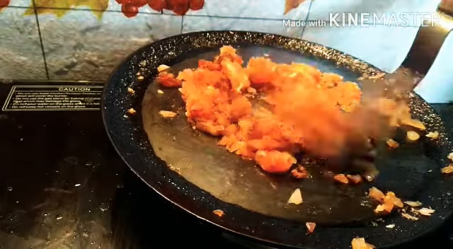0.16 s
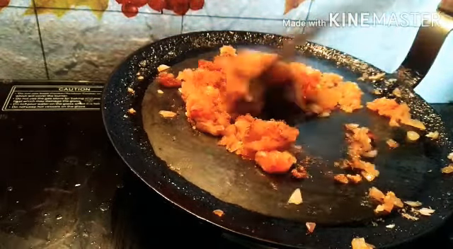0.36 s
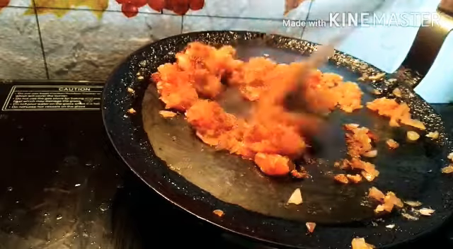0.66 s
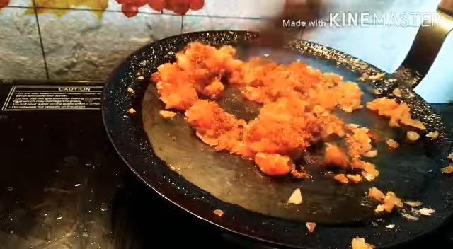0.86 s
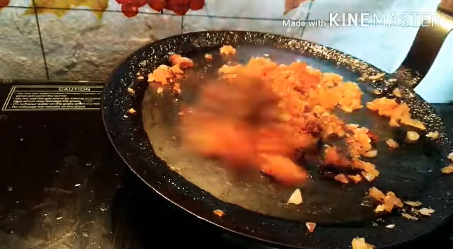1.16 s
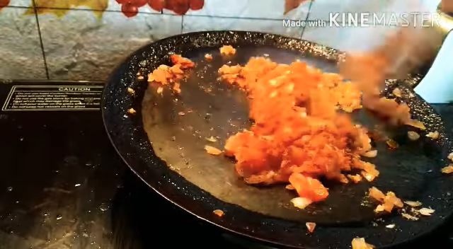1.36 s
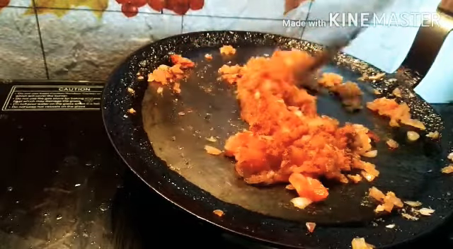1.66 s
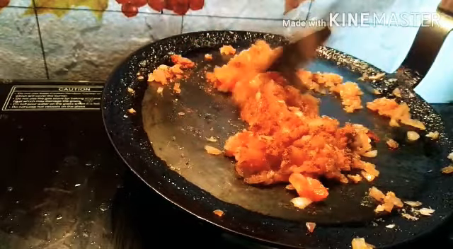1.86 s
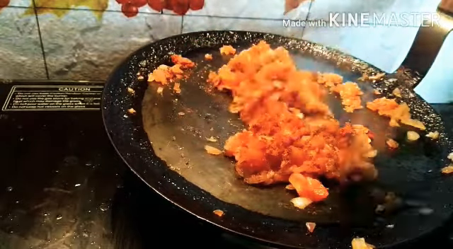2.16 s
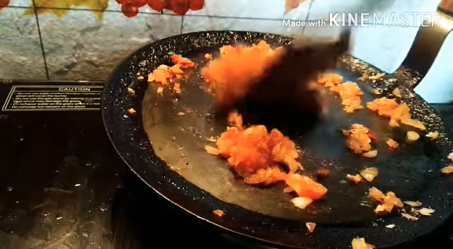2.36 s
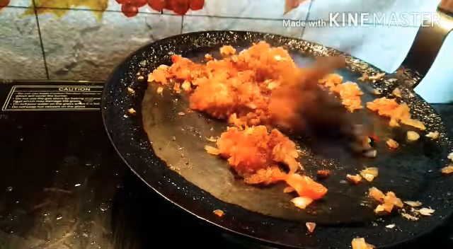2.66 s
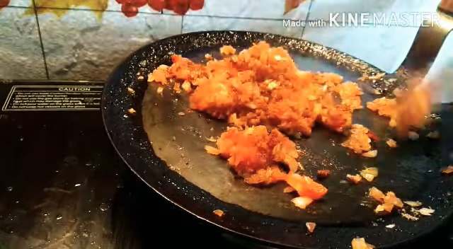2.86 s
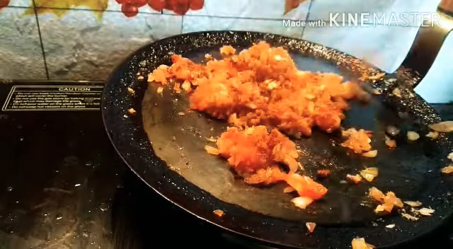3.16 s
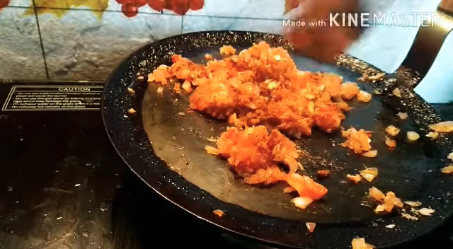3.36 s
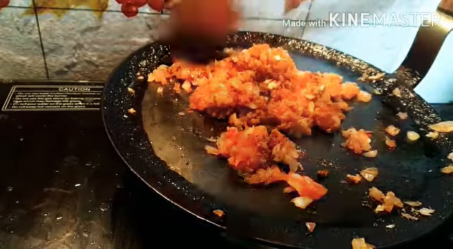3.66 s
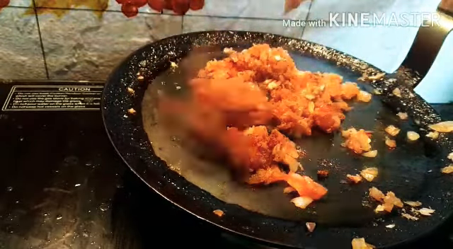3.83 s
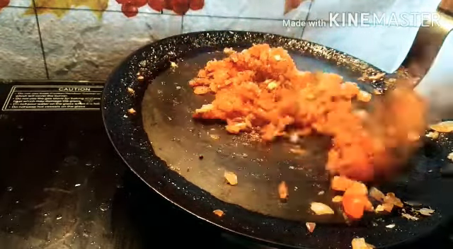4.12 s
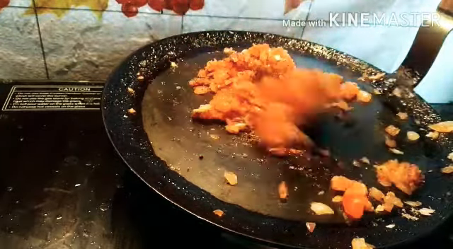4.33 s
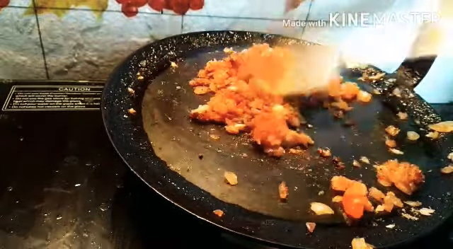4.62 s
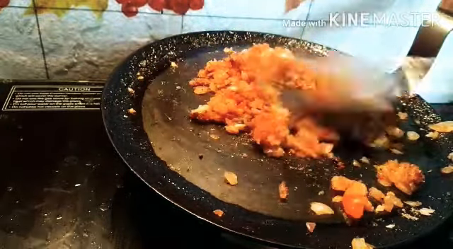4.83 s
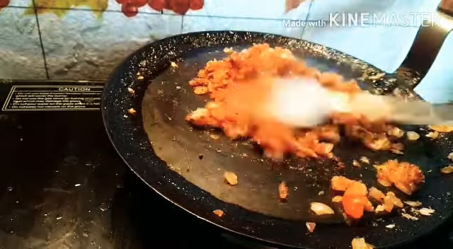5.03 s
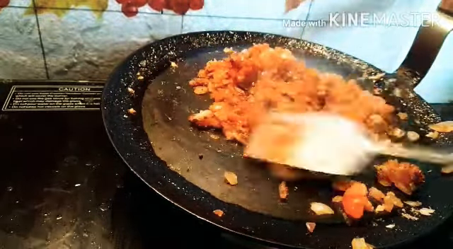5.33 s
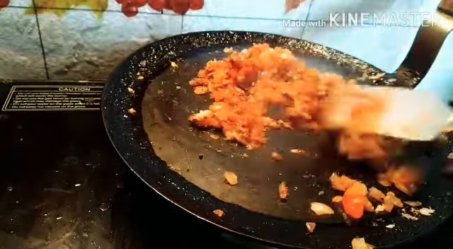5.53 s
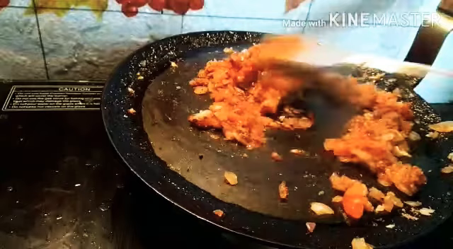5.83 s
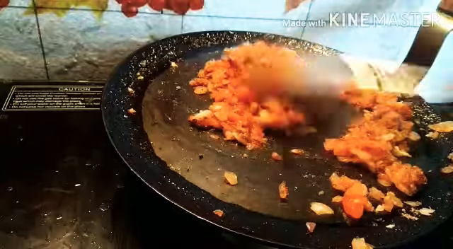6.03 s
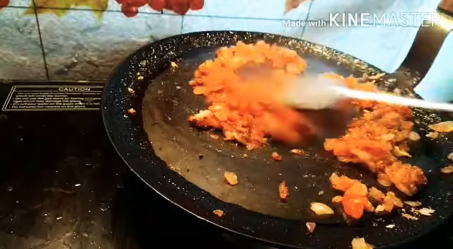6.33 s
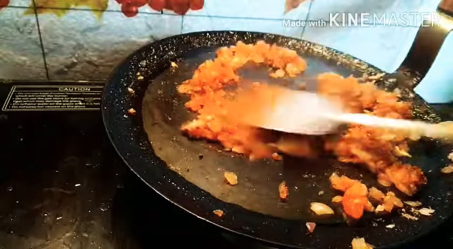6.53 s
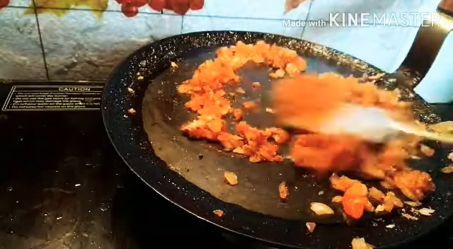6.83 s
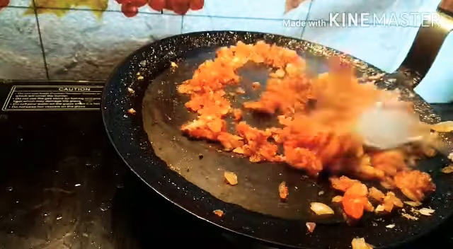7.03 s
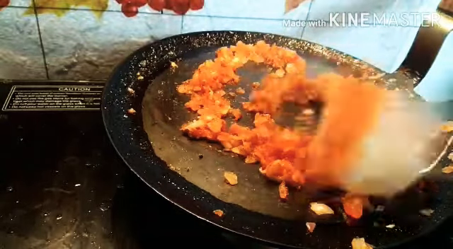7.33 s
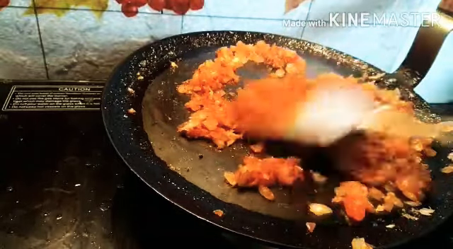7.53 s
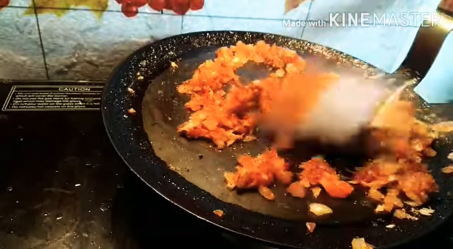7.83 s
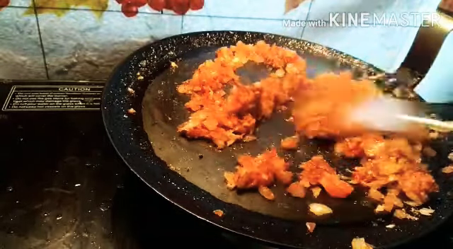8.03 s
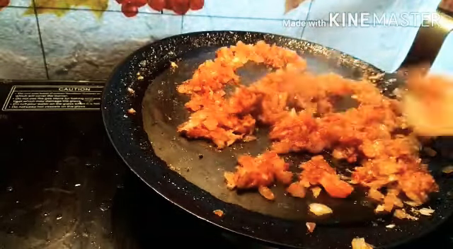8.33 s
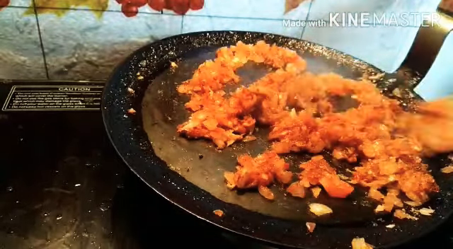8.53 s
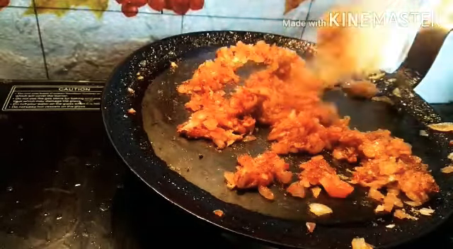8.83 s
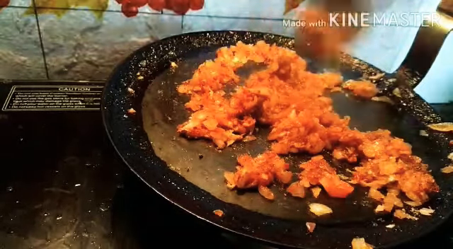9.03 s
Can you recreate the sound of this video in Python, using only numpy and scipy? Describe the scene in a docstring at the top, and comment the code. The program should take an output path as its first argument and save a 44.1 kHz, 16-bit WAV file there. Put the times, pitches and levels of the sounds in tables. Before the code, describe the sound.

A steel spatula turns chopped vegetables on a flat iron griddle, close to the microphone in a small kitchen with a slight echo. Oil sizzles faintly throughout, above a barely audible low burner rush. From the start until about 4.3 seconds, the blade lands in sharp, uneven clacks, roughly two a second, each with a brief metallic ring and a short skid, sometimes a tiny squeak. The strongest fall near 2.2, 3, 3.4 and 4.3 seconds. After that the stirring turns quieter, with light scrapes and soft, wet pushes through the food. The griddle bumps dully on its stand several times around 5.8 to 6 seconds, again between 7.1 and 7.6, and near 8.5. A brighter scrape comes at 7.5 seconds and a thin squeak just after 8. One last loud, ringing clack and short scrape arrive at about 9 seconds.

```python
"""Spatula on a griddle

A small tiled kitchen, a stereo microphone close to a flat iron griddle. A steel spatula turns chopped
vegetables: it lands with a short chatter, skids over the iron, catches with a squeak and pushes the wet
heap along; later it mostly nudges the food. The griddle bumps on its stand now and then, and oil
sizzles faintly throughout over the low rush of the burner."""
import sys
import numpy as np
from scipy import signal
from scipy.fft import rfft, irfft, next_fast_len
from scipy.io import wavfile

SR = 44100
rng = np.random.default_rng(int(sys.argv[2]) if len(sys.argv) > 2 else 0)


def store_wav(level_fs):
    """Save 16-bit WAV to argv[1]."""
    pcm = np.round(np.clip(np.atleast_2d(level_fs), -1, 1) * 32767)
    wavfile.write(sys.argv[1], SR, pcm.T.astype(np.int16))


N = 404838

# blade landings and the skid after each: (time [s], contact [s], level [dB], brightness [dB],
# thud [dB], plate ring [dB], skid length [s], skid against landing [dB])
LANDINGS = [(.19, 0.034, -41, -5, -32, -29.5, 0.0024, 0), (.213, 0.022, -28, 2.5, -40, -28, 0.016, 0),
            (.601, 0.019, -38, 6, -38, -58, 0.0004, 3), (.61, 0.0067, -21.5, 3.5, -45.5, -57, 0.085, -11),
            (1.013, 0.0078, -18.5, -3, -28, -44, 0.051, -11.5),
            (1.515, 0.025, -22.5, 3.5, -37.5, -53, 0.046, -3),
            (1.837, 0.0095, -19, 2, -31.5, -12.5, 0.13, -9.5),
            (1.922, 0.015, -31.5, 7.5, -46, -60, 0.0086, 0), (2.248, 0.015, -16, 1, -23.5, -33, 0.089, -8),
            (2.975, 0.0098, -15.5, 1.5, -24, -31, 0.052, -9),
            (3.448, 0.0064, -13, -3, -33.5, -20, 0.14, -20), (4.255, 0.019, -15, 1, -26.5, -26, 0.056, -9),
            (6.311, 0.0071, -50.5, -14.5, -48.5, -34, 0.0065, 0),
            (7.098, 0.0042, -37, -1, -41, -58, 0.034, -9.5), (7.169, 0.0072, -51, -1, -63, -41, 0.0042, 0),
            (8.076, .003, -40, 0.5, -62, -49, 0, -2), (8.084, .013, -42.5, 5.5, -65, -57, 0.092, -4.5),
            (8.616, 0.019, -64.5, -15, -51, -48, 0.0067, 1),
            (9.049, 0.0099, -15.5, -2.5, -30, -18, 0.16, -15)]


def from_db(db):
    """Decibels to gain."""
    return 10 ** (np.asarray(db) / 20)


def rms(x):
    """Root mean square."""
    return np.sqrt(np.mean(x ** 2) + 1e-20)


def at_hz(points, hz):
    """Read a table on a log-frequency axis."""
    known_hz, values = np.transpose(points)
    return np.interp(np.log(np.maximum(hz, 1)), np.log(known_hz), values)


def add(out, s, sound):
    """Mix a sound in at time s."""
    i = max(round(s * SR), 0)
    out[..., i:i + sound.shape[-1]] += sound[..., :N - i]


def band(x, low_hz, high_hz, order=2):
    """Causal band-pass."""
    sos = signal.butter(order, [low_hz, min(high_hz, SR / 2 - 10)], "band", fs=SR, output="sos")
    return signal.sosfilt(sos, x)


def colour(x, spectrum):
    """Give a signal a smooth spectrum."""
    n = next_fast_len(x.shape[-1] + 2048)
    gain = from_db(at_hz(spectrum, np.fft.rfftfreq(n, 1 / SR)))
    return irfft(rfft(x, n) * gain, n)[..., :x.shape[-1]]


def drift(n, rate):
    """A random wander with about rate turns a second."""
    knots = rng.standard_normal(4096)
    return np.interp(np.arange(n) * rate / SR, np.arange(len(knots)), knots)


def ring(clicks, hz, t60):
    """A unit click sets a sine of height 1 ringing."""
    decay, step = from_db(-60 / (t60 * SR)), 2 * np.pi * hz / SR
    return signal.lfilter([0, np.sin(step)], [1, -2 * decay * np.cos(step), decay ** 2], clicks + 1e-18)


def grains(shape, per_s, spread_db=3.0):
    """Random clicks of uneven size and sign."""
    born = rng.random(shape) < per_s / SR
    sign = rng.choice([-1, 1], shape)
    return born * sign * from_db(spread_db * np.minimum(rng.exponential(1, shape), 4))


def at_ports(pair):
    """Two unrelated signals become the microphone's left and right, alike in the bass."""
    # likeness of the two ports: (frequency [Hz], correlation)
    likeness = [(60, 0.49), (250, 0.94), (700, 0.13), (1500, 0.48), (3000, 0.28), (7000, 0)]
    n = next_fast_len(pair.shape[-1])
    mid, side = rfft(pair, n)
    alike = at_hz(likeness, np.fft.rfftfreq(n, 1 / SR))
    spectra = np.sqrt((1 + alike) / 2) * mid + np.sqrt((1 - alike) / 2) * side * [[1], [-1]]
    return irfft(spectra, n)[:, :pair.shape[-1]]


def kitchen(x, build_s=0.0035):
    """Diffuse echo off the tiled walls; it builds up quickly and dies soonest at the very top."""
    # decay of the room: (frequency [Hz], t60 [s])
    decay = [(100, 0.37), (500, 0.29), (2000, 0.32), (5000, 0.3), (10000, 0.39), (16000, 0.21)]
    t = np.arange(SR * 2 // 3) / SR
    white = at_ports(rng.standard_normal((2, len(t))))
    edges_hz = np.geomspace(40, 18000, 10)
    tail = sum(band(white, low, high) * from_db(-60 * t / at_hz(decay, np.sqrt(low * high)))
               for low, high in zip(edges_hz, edges_hz[1:]))
    tail *= 1 - np.exp(-(t / build_s) ** 2)
    return signal.fftconvolve(x, tail / (rms(tail) * np.sqrt(len(t))), axes=1)[:, :N]


def burner(level_db=-64.5, flutter_db=3.0):
    """The low, unsteady rush of the stove, far down in the background."""
    # colour of the rush: (frequency [Hz], level [dB])
    spectrum = [(25, -30), (55, -7), (88, 3.5), (125, -10), (250, -10.5), (390, -9), (620, -8),
                (1100, -27.5), (2500, -51.5)]
    rush = colour(at_ports(rng.standard_normal((2, N))), spectrum)
    return rush / rms(rush) * from_db(level_db + flutter_db * drift(N, rate=14))


def sizzle(crackle_db=-2, gain_db=4.0):
    """Countless tiny bursts in the oil merge to a steady hiss; those nearer the microphone prickle."""
    # colour of frying oil: (frequency [Hz], level [dB])
    spectrum = [(500, -37.5), (900, -10.5), (1350, -13.5), (1500, -4), (1690, -14), (1900, -8.5),
                (3200, -6.5), (5000, -4), (7300, -7), (11400, 3.5), (15500, -5)]
    # vigour of the frying: (time [s], level [dB])
    vigour = [(0.0, -47.5), (0.53, -52), (0.68, -49.5), (2.1, -48), (3.31, -50.5), (3.56, -49.5),
              (4.41, -52), (7.67, -51.5), (7.87, -52.5), (9.0, -54)]
    pops = grains((2, N), per_s=660, spread_db=0.5)
    bursts = rng.standard_normal((2, N)) + from_db(crackle_db) * pops / rms(pops)
    hiss = colour(at_ports(bursts), spectrum)
    vigour_db = np.interp(np.arange(N) / SR, *np.transpose(vigour))
    return hiss / rms(hiss) * from_db(vigour_db + gain_db)


def heap(ring_cycles=20, spread_octaves=0.45, attack_s=0.023, release_s=0.022, lumpy_db=2, gain_db=-1):
    """Soft wet pieces tumble and squelch, each with a short low note near the pitch of the push."""
    # the blade pushes the food: (time [s], length [s], level [dB], squelch pitch [Hz])
    pushes = [(0.0, .14, -51, 383), (0.798, .04, -61, 296), (0.916, .06, -62, 440),
              (2.06, 0.047, -60.5, 310), (3.042, 0.056, -42.5, 420), (3.118, 0.11, -57, 490),
              (4.071, 0.18, -63.5, 529.4), (5.292, 0.28, -65.5, 520), (5.55, 0.024, -53.5, 530),
              (5.678, 0.21, -60.5, 530), (6.885, 0.12, -62, 296), (7.288, 0.31, -63, 380),
              (7.721, .11, -54, 340), (7.844, 0.033, -48.5, 293), (8.353, 0.28, -62.5, 423),
              (8.593, 0.034, -47.5, 294), (8.66, 0.14, -57.5, 480)]
    out, t = np.zeros(N), np.arange(SR // 2) / SR
    notes_hz = np.geomspace(230, 700, 14)
    for s, length_s, db, pitch_hz in pushes:
        shares = 1 / (1 + (np.log2(notes_hz / pitch_hz) / spread_octaves) ** 2)
        notes = [ring(grains(len(t), per_s=140), hz, ring_cycles / hz) for hz in notes_hz]
        plops = sum(share * note / rms(note) for share, note in zip(shares, notes))
        effort = np.minimum(t / attack_s, 1) * np.exp(-np.maximum(t - length_s, 0) / release_s)
        level = from_db(db + gain_db + lumpy_db * drift(len(t), rate=35))
        add(out, s, level * effort * plops / rms(plops))
    return out


def bumps(gain_db=-5):
    """The griddle knocks on its stand and sets the stand's low modes ringing."""
    # dull knocks: (time [s], level [dB])
    knocks = [(5.807, -31), (5.843, -25.5), (5.868, -27), (5.917, -25), (6.017, -32.5), (7.101, -30),
              (7.162, -27.5), (7.511, -35), (7.578, -30.5), (8.399, -40), (8.551, -29.5)]
    # modes of the stand: (frequency [Hz], level [dB], t60 [s])
    modes = [(63, -2, 0.048), (92.7, -0.5, 0.12), (132, -2.5, 0.034), (185, -27, 0.025)]
    clicks = np.zeros(N)
    for s, db in knocks:
        add(clicks, s, from_db([db + gain_db]))
    return sum(from_db(db) * ring(clicks, hz, t60) * (-1) ** k for k, (hz, db, t60) in enumerate(modes))


def squeaks():
    """The edge catches: stick and slip briefly feeds one resonance of blade or plate."""
    # catches of the edge: (time [s], length [s], resonance name, level [dB])
    catches = [(.61, 0.0072, "zing", -13.5), (1.011, .013, "creak", -16.5), (1.212, .04, "drone", -46),
               (2.248, 0.034, "zing", -16.5), (2.251, 0.029, "whistle", -19), (2.337, .016, "screech", -30),
               (2.972, 0.016, "screech", -16.5), (5.653, .028, "drone", -53),
               (5.736, 0.081, "groan", -51.5), (5.98, .065, "scratch", -41), (7.106, 0.024, "groan", -39),
               (7.489, 0.062, "drone", -43.5), (8.07, .042, "zing", -27.5), (8.123, 0.045, "creak", -46),
               (8.135, 0.049, "scratch", -40), (9.048, 0.014, "screech", -14.5), (9.135, .06, "drone", -35)]
    # resonances by name: (frequency [Hz], width [Hz])
    resonances = {"groan": (527, 35), "drone": (916, 78), "creak": (2015, 180), "screech": (4760, 400),
                  "scratch": (6110, 1200), "whistle": (10230, 50), "zing": (11380, 260)}
    out, t = np.zeros((2, N)), np.arange(SR // 8) / SR
    for s, length_s, name, db in catches:
        hz, width_hz = resonances[name]
        friction = rng.standard_normal((2, len(t))) * np.exp(-(t / length_s) ** 2)
        tone = band(friction, hz - width_hz / 2, hz + width_hz / 2, order=1)
        add(out, s, from_db(db) * tone / rms(tone[:, :round(length_s * SR)]))
    return out


def register_levels(balance_db, level_db, brightness_db, thud_db):
    """The weight behind the blade sets the thud; its force and angle set the four upper registers."""
    # a steeper blade sounds brighter: (clank, grind, rasp, sheen) [dB per dB of brightness]
    tilt = (-0.93, -.5, -0.032, 0.9)
    return [thud_db, *(level_db + np.array(balance_db) + brightness_db * np.array(tilt))]


def griddle(force, levels_db, held_s, modes_db, knock_t60=0.0071, wash_db=-16, wash_t60=0.13):
    """What a force on one spot radiates: a dead knock, a wash of dense modes and the clear modes."""
    # broad colour of steel on iron: (frequency [Hz], level [dB])
    contact = [(60, 3), (140, 1.5), (195, -14), (260, 3.5), (480, 8.5), (650, 0), (1200, -5), (2000, 5.5),
               (2600, -0.5), (4700, 7.5), (7000, -3.5), (9500, 1.5), (11300, 4.5), (15500, -5.5)]
    # modes of griddle and blade: (frequency [Hz], level [dB], t60 [s])
    modes = [(143, -19.5, 0.21), (269, -15, 0.11), (348.3, -13, 0.14), (420, -12, 0.066),
             (522.5, -8.5, 0.18), (766, -12, 0.015), (864, -8, .09), (913, -5, 0.13), (1433, 0.5, 0.027),
             (1526, -7.5, 0.067), (2050, -5.5, 0.1), (3410, -10.5, 0.041), (3696, -1.5, .035),
             (4000, -33, .07), (4575, -6.5, 0.23), (4985, 1, 0.083), (5600, -2.5, 0.06), (5920, -4, 0.064),
             (7200, -15.5, 0.055), (8020, -9, 0.11), (8200, -7, 0.018), (8515, 1, 0.053),
             (10200, -1.5, 0.11), (10880, -3.5, 0.12), (11440, 2, 0.058), (11760, -7.5, 0.055),
             (12640, -6, 0.06)]
    # the registers thud, clank, grind, rasp and sheen: (low edge [Hz], high edge [Hz])
    registers = [(60, 600), (720, 1100), (1100, 2800), (2800, 7000), (7000, 16000)]
    t = np.arange(len(force)) / SR
    fall = from_db(-60 * t)
    envelope = fall ** (1 / knock_t60) + from_db(wash_db) * fall ** (1 / wash_t60)
    body = at_ports(colour(rng.standard_normal((2, len(t))) * envelope, contact))
    for hz, db, t60 in modes:
        lag = rng.normal(0, min(hz / 1500, 3), (2, 1))  # high modes reach the ports out of step
        spot_db = -0.5 * rng.standard_normal()  # every spot favours other modes
        body += from_db(db + modes_db + spot_db) * np.sin(2 * np.pi * hz * t + lag) * fall ** (1 / t60)
    sound = signal.fftconvolve(force[None], body, axes=1)[:, :len(t)]
    out = 0
    for (low, high), db in zip(registers, levels_db):  # weighted by blade angle and the food under it
        part = band(sound, low, high, order=4)
        out += from_db(db) * part / rms(part[:, :round(held_s * SR)])
    return out


def slide(out, s, length_s, swell_db, levels_db, rise_s, lift_s, modes_db, judder_db=1.5):
    """Mix in the edge grinding over the iron in thousands of tiny slips, under an unsteady hand."""
    t = np.arange(SR // 2) / SR
    pressure = from_db(swell_db * np.minimum(t / length_s, 1) + judder_db * drift(len(t), rate=180))
    touch = np.minimum(t / rise_s, 1) * np.exp(-np.maximum(t - length_s, 0) / lift_s)
    force = grains(len(t), per_s=7000) * pressure * touch
    add(out, s - rise_s / 2, griddle(force, levels_db, length_s + rise_s / 2, modes_db))


def scrapes(swell_db=2, gain_db=-6.0):
    """The blade, already on the iron, gains pressure as it digs in under the food, then lifts off."""
    # strokes without a landing: (time [s], length [s], level [dB], brightness [dB], thud [dB])
    strokes = [(0.484, 0.13, -48, 1.5, -76), (1.175, 0.057, -40, 4, -50), (2.323, 0.012, -31.5, -6, -39),
               (2.558, .15, -49, 2.5, -60.5), (4.651, 0.068, -49, -3, -72), (4.725, 0.087, -52, -7, -67),
               (4.829, 0.016, -47, 5.5, -69), (5.374, .11, -54, 4, -57.5),
               (5.616, 0.13, -63.5, -19.5, -55.5), (5.927, 0.13, -42, -3, -62),
               (6.239, 0.11, -46.5, -5.5, -52.5), (7.129, 0.069, -46, 0.5, -50),
               (7.428, 0.059, -48.5, 3, -51), (7.469, 0.043, -29.5, 7, -46), (9.127, 0.062, -43, -17, -47)]
    # tone of a scrape: (clank [dB], grind [dB], rasp [dB], sheen [dB])
    balance = (-13, -3, 2.5, 3.5)
    out = np.zeros((2, N))
    for s, length_s, db, brightness_db, thud_db in strokes:
        levels_db = register_levels(balance, db, brightness_db, thud_db)
        slide(out, s, length_s, swell_db, levels_db, rise_s=.02, lift_s=0.024, modes_db=-23)
    return from_db(gain_db) * out


def skids(delay_s=.009, fade_db_per_s=165.5, gain_db=-5.5):
    """As a landing's chatter ends, the blade slides on at the same angle, steadily losing pressure."""
    # tone of a skid: (clank [dB], grind [dB], rasp [dB], sheen [dB])
    balance = (-7.5, -7.5, -0.5, 5.5)
    out = np.zeros((2, N))
    for s, contact_s, db, brightness_db, thud_db, _, skid_s, skid_db in LANDINGS:
        if skid_s > delay_s:
            levels_db = register_levels(balance, db + skid_db, brightness_db, thud_db + skid_db)
            slide(out, s + contact_s + delay_s, skid_s, -fade_db_per_s * skid_s, levels_db,
                  rise_s=.008, lift_s=0.017, modes_db=-23.5)
    return from_db(gain_db) * out


def landings(cut_s=.008, cut_db=-28, chatter_fade_db=-4, settle_s=0.0067, right_db=1.5, gain_db=-2.5):
    """The edge cuts softly through the food, lands with a brief chatter and rings the plate."""
    # tone of a landing: (clank [dB], grind [dB], rasp [dB], sheen [dB])
    balance = (-4.5, -3.5, 0.13, 5)
    out, lead = np.zeros((2, N)), round(cut_s * SR)
    t = (np.arange(SR // 2) - lead) / SR
    for s, contact_s, db, brightness_db, thud_db, ring_db, _, _ in LANDINGS:
        pressure = from_db(np.where(t < 0, cut_db, chatter_fade_db * t / contact_s)) * (t < contact_s)
        force = grains(len(t), per_s=4500) * pressure
        force[lead] += 2.7  # the sharp first touch of steel on iron
        held_s = contact_s + settle_s
        levels_db = register_levels(balance, db, brightness_db, thud_db)
        clack = griddle(force, levels_db, cut_s + held_s, modes_db=-16)
        clack *= np.sqrt(held_s / (cut_s + held_s))  # the quiet cut does not count towards the level
        plate = from_db(ring_db) * ring(t == 0, hz=918, t60=.125)  # main mode, damped by the food
        add(out, s - cut_s, clack + plate)
    return from_db(gain_db) * out * from_db([[-right_db / 2], [right_db / 2]])


def scene(echo_db=-9):
    """Spatula, food and griddle up close, with the kitchen's echo, the oil and the burner behind."""
    work = landings() + skids() + scrapes() + squeaks() + bumps() + heap()
    return work + from_db(echo_db) * kitchen(work) + sizzle() + burner()


def record(dry, full_scale=.88, cutoff_hz=15700):
    """The microphone's two unequal ports share the power; peaks are clipped and the top is cut."""
    # the right port is dull on top: (frequency [Hz], left minus right [dB])
    imbalance = [(100, 0), (2500, 0), (4500, -3.5), (6500, 0), (8200, 2), (10000, 10.5), (15000, 17.5)]
    left = [(hz, 10 * np.log10(2 / (1 + from_db(-2 * db)))) for hz, db in imbalance]
    right = [(hz, 10 * np.log10(2 / (1 + from_db(2 * db)))) for hz, db in imbalance]
    heard = np.clip([colour(dry[0], left), colour(dry[1], right)], -full_scale, full_scale)
    return signal.sosfilt(signal.ellip(10, .1, 80, cutoff_hz, fs=SR, output="sos"), heard)


dry = scene()
out = record(dry)
store_wav(out)
```